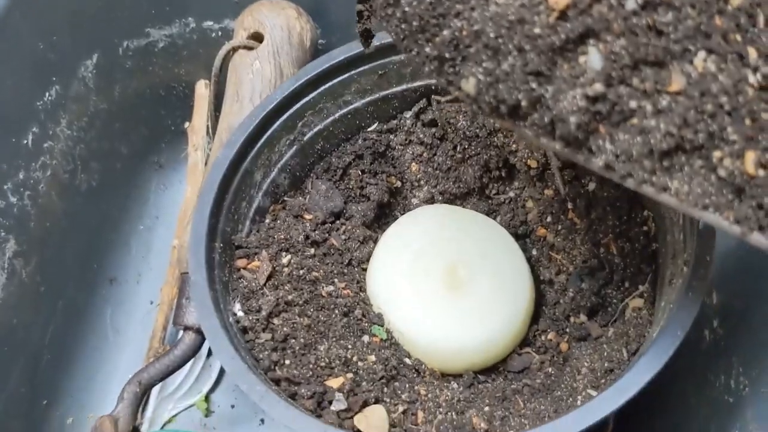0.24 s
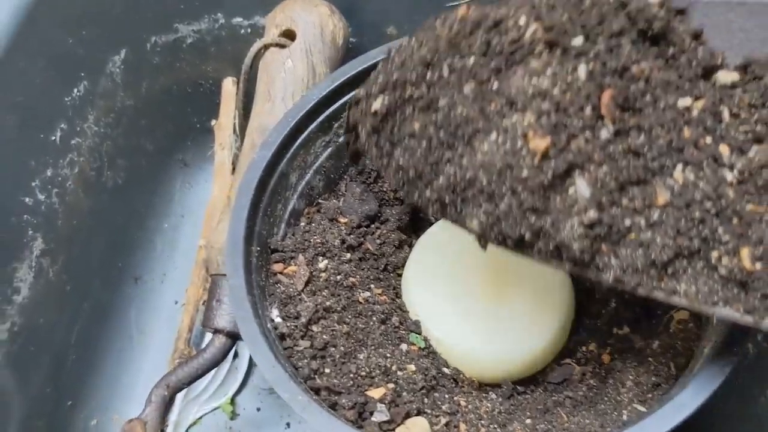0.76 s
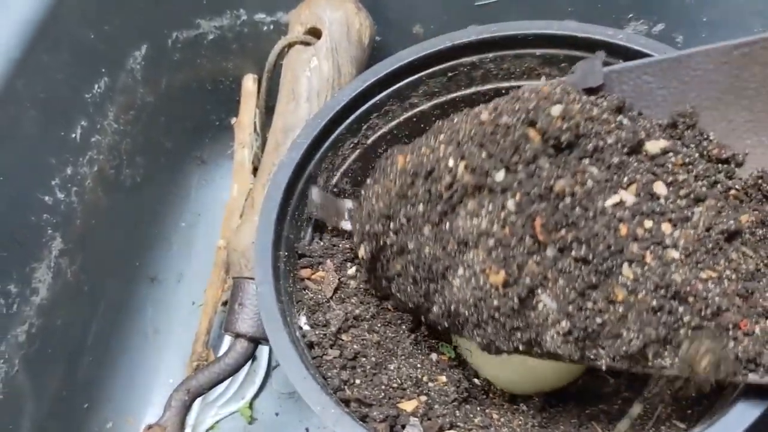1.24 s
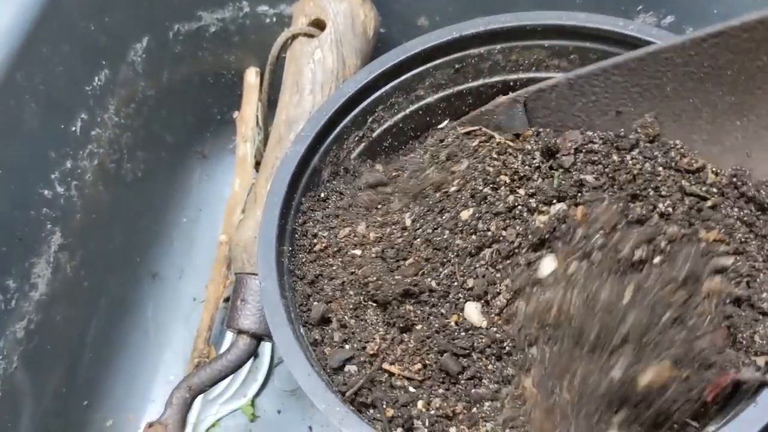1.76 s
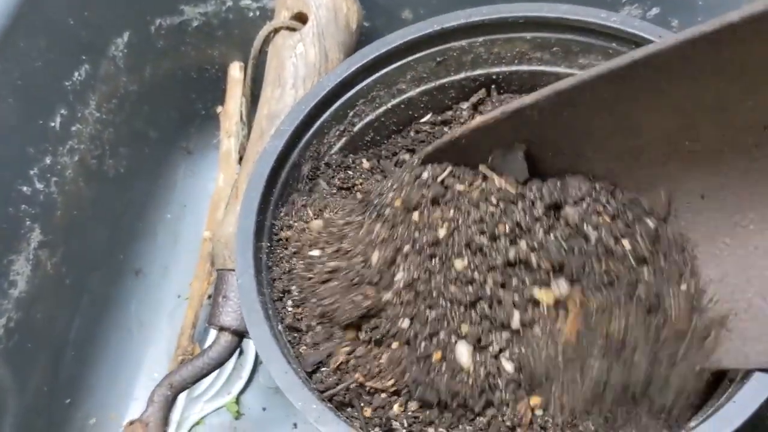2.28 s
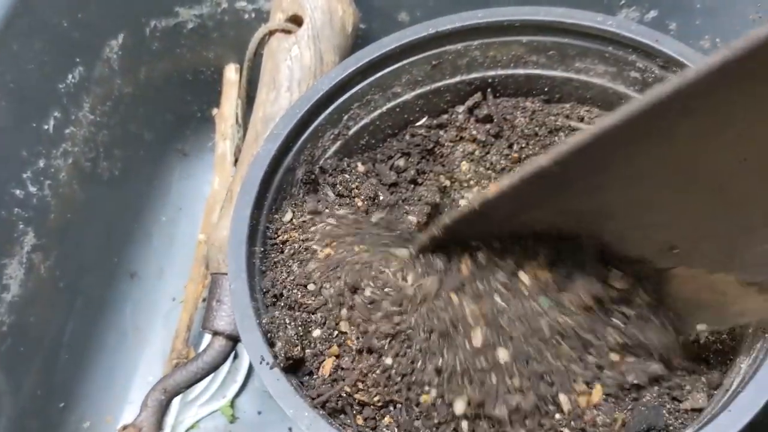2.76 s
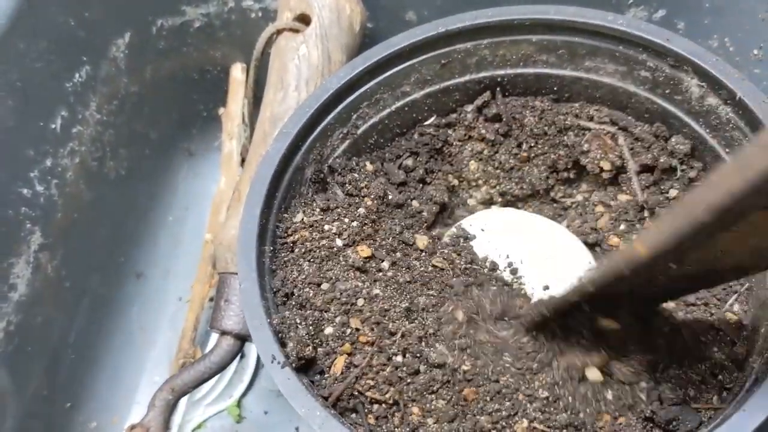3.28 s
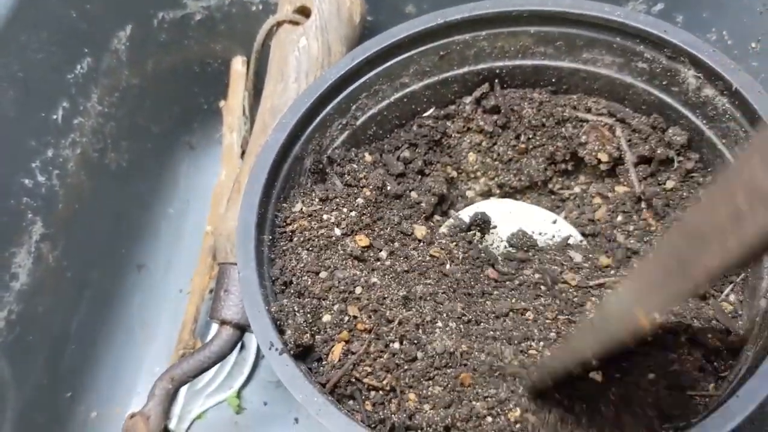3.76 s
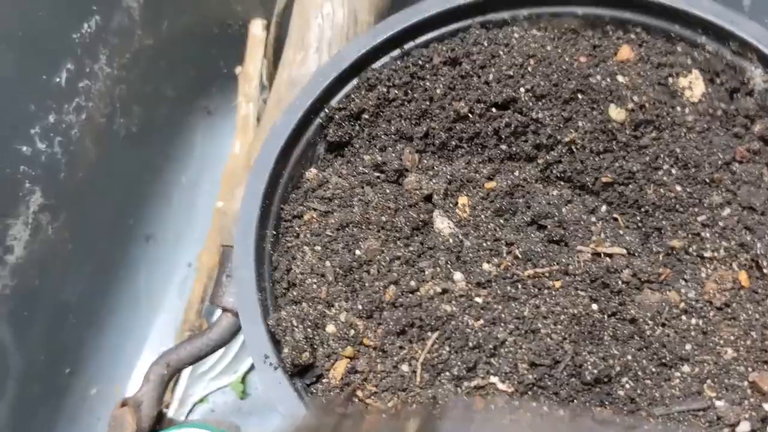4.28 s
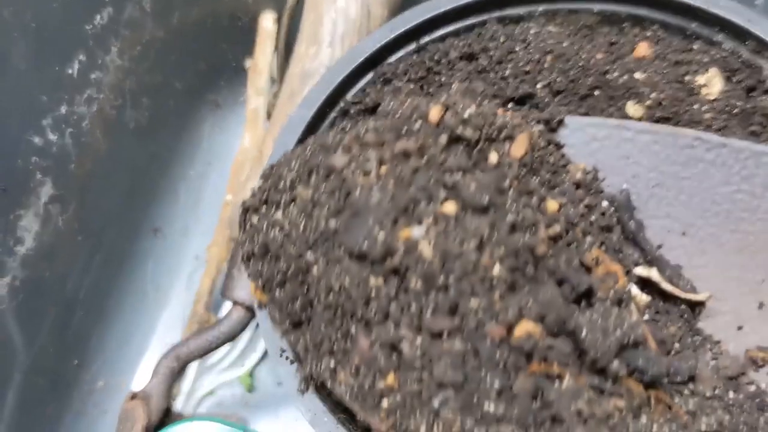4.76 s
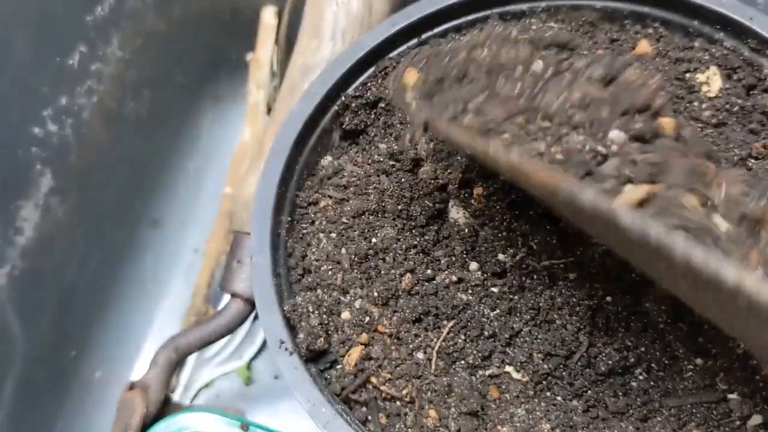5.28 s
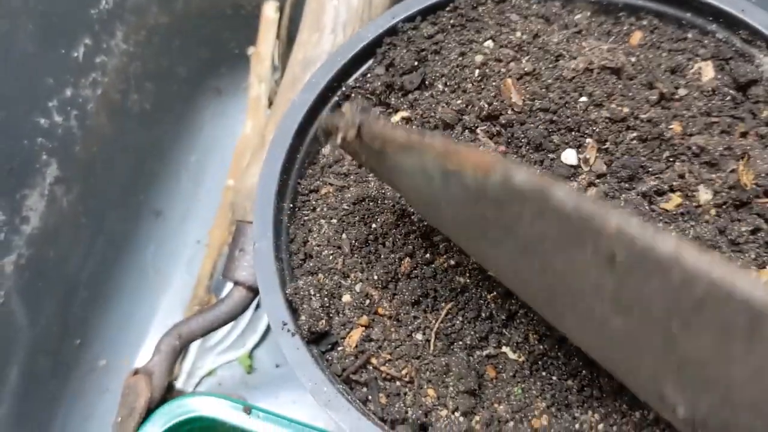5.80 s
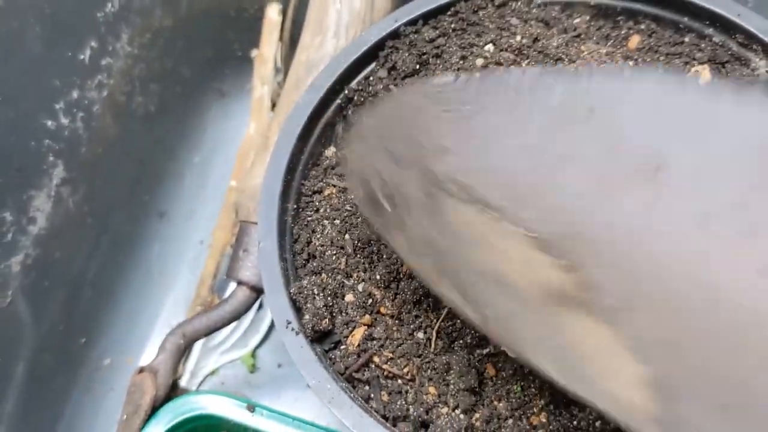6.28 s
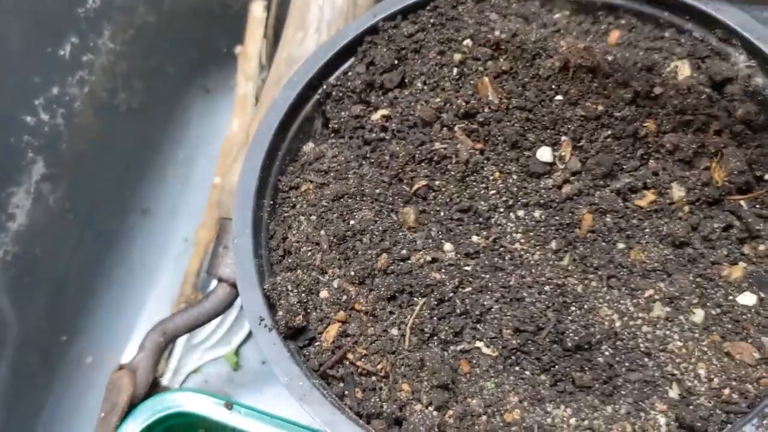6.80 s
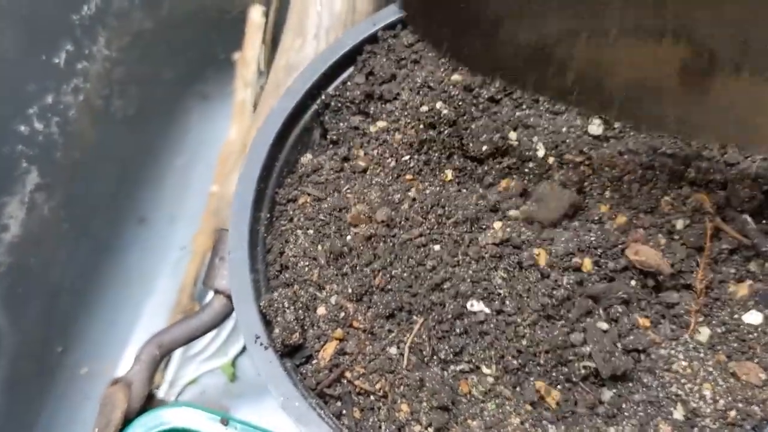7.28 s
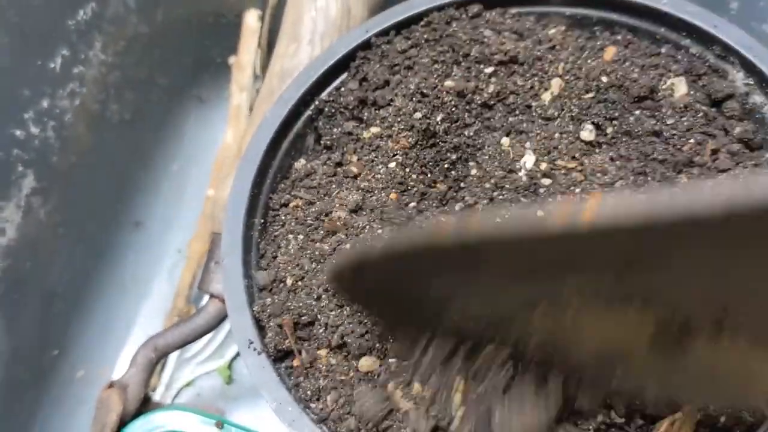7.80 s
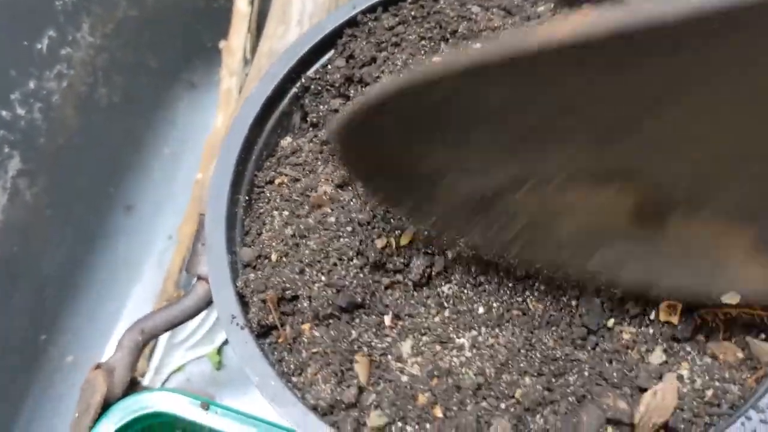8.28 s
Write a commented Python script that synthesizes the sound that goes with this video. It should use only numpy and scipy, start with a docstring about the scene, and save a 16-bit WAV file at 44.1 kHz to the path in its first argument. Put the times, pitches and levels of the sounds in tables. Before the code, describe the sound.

Close crunching and hissing of potting soil poured from a metal trowel, hollow knocks on the pot, a brief silence midway, faint outdoor rumble.

```python
"""Gritty soil runs off a steel trowel around a bulb in a plastic pot, outdoors and close to the microphone.
Crumbs and grit are showers of tiny noise clicks, pebbles are filtered bursts, and lumps swell in low noise.
The blade scrapes and clinks in decaying sine modes; it knocks on the pot, which thumps in its tub.
A distant bang of low swings and noise echoes at the start, over a steady rumble, hiss and hum.
Halfway, the sound cuts out briefly between two scoops."""
import sys
import numpy as np
from scipy import signal
from scipy.fft import rfft, irfft, next_fast_len
from scipy.io import wavfile

SR = 44100
rng = np.random.default_rng(int(sys.argv[2]) if len(sys.argv) > 2 else 0)


def transcribe(u):
    """Save the signal u as a 16-bit wav file named by the first command-line argument.

    u: samples, shape (n,) or (channels, n), limited to [-1, 1]; the rate is SR.
    q: integer samples, one column per channel.
    """
    v = np.clip(np.atleast_2d(u).T, -1, 1)
    q = np.round(v * 32767).astype(np.int16)
    wavfile.write(sys.argv[1], SR, q)


N = 376613
TIME = np.arange(N) / SR

# Steady air of the place: (frequency [Hz], relative density [dB per Hz])
AIR_SPECTRUM = [(15, -23.5), (25, 0), (102, -4), (190, -6.5), (223, -13), (326, -8), (363, -14.5),
                (394, -11), (545, -17), (695, -16.5), (1330, -21.5), (1940, -22), (2220, -23.5),
                (14400, -34), (16000, -38)]
# Distant machinery: (frequency [Hz], level [dB])
HUM_TONES = [(102, -66), (151, -67.5), (329, -65), (2930, -78.5)]
# Likeness of surrounding sound at the two ports: (frequency [Hz], correlation [-1 to 1])
PORT_LIKENESS = [(100, 0.9), (300, 0.8), (700, 0.28), (1400, -0.069), (3000, -0.0032), (16000, -0.071)]
# Lean of close sound from the pot: (frequency [Hz], left over right [dB])
NEAR_LEAN = [(200, 5.5), (600, -3.5), (1400, 3.5), (3000, 4.5), (5500, 26.5), (9000, 32.5), (14000, -12)]

# Distant bang, then its echoes off buildings: (time [s], relative level [dB], low-pass corner [Hz])
BANG_ECHOES = [(.139, -12.5, 6000), (0.221, -33.5, 1200), (.311, -28.5, 444), (.478, -31.5, 527),
               (.56, -42.5, 293), (0.681, -38, 193)]
# Low pressure swings of the bang: (frequency [Hz], relative level [dB], t60 [s])
BLAST_SWINGS = [(84.7, 3, 0.14), (160.4, -4, 0.18)]
# Roar of the bang: (frequency [Hz], relative density [dB per Hz])
ROAR_SPECTRUM = [(40, -26), (100, -3.5), (170, -3), (240, -11.5), (420, -10.5), (620, -12.5), (830, -14.5),
                 (1200, -26), (2200, -34.5), (3800, -49.5), (8000, -53), (15000, -57)]
# Dying of the roar: (frequency [Hz], t60 [s])
ROAR_DECAY = [(60, 1), (200, 0.27), (700, 0.22), (3000, 0.37), (10000, 0.48)]

# Trowel against the pot: (time [s], relative wall level [dB], hardness as low-pass [Hz], thump level [dB])
POT_KNOCKS = [(2.074, -22.5, 940, -49), (3.247, -24.5, 2220, -47), (3.417, -24, 1700, -45),
              (3.755, -37, 1620, -65), (3.999, -26, 2500, -30), (4.13, -60.5, 390, -26.5),
              (4.2547, -14, 3350, -16), (5.675, -33.5, 855, -76), (5.74, -34.5, 1400, -65),
              (7.107, -13, 2570, -12.5), (7.991, -17.5, 1760, -55), (8.042, -12, 3900, -24),
              (8.088, -15, 5700, -29), (8.1005, -12, 1320, -23.5)]
# Modes of the plastic wall: (mean frequency [Hz], relative level [dB], t60 [s])
WALL_MODES = [(375, -17, 0.047), (470.5, -19, 0.11), (570, -2, 0.015), (701, -6.5, 0.034), (848, -4, 0.035),
              (1073, -10, 0.023), (1370, -8.5, 0.028), (1620, -2, 0.014), (1872, 4, 0.021), (2360, 7, 0.01),
              (2820, 6, 0.011), (3264, 5, 0.014), (4010, -2, 0.016), (5180, -1, 0.0084)]
# Filled pot rocking in its tub: (frequency [Hz], relative level [dB], t60 [s])
TUB_MODES = [(77, -19.5, 0.32), (134, 0, 0.16), (200.7, 0, 0.081), (292.5, -7.5, 0.1)]

# Modes of the bare blade: (frequency [Hz], relative level [dB], t60 [s], left over right [dB])
BLADE_MODES = [(1902, -9, 0.95, 4), (2672, -17, 0.38, -13.5), (3330, -7, 0.16, -10.5),
               (4040, 4.5, 0.073, 2), (4790, -2, 0.15, 2), (5460, -7.5, .17, 1), (5530, 1.5, 0.05, -9),
               (6560, -9, .17, -13.5), (7250, -14, 0.17, 17.5), (7860, -24, .17, 8), (8330, -16, 0.21, 5),
               (8600, 6.5, 0.065, -1), (9700, -12.5, .15, -5), (10610, -6, .11, 4), (11110, -16, .09, -26),
               (13370, -22, .13, 2), (13790, -4, 0.1, -9), (15310, -17, .12, -3)]
# Steel struck by a stone or the rim:
# (time [s], relative ring [dB], tilt [dB per octave], favoured tone [Hz], relative clash [dB])
STEEL_CLINKS = [(1.932, -45, 2, 4800, -44), (4.212, -49, 0, 2650, -47), (5.453, -40, 5, 4800, -37),
                (7.107, -46, -2.5, 2700, -58), (7.6283, -31, 6, 8600, -15), (8.089, -32, 2.5, 4800, -17),
                (8.103, -47, -9, 1900, -40)]
# Grit along the steel: (time [s], length [s], level [dB], tilt [dB per octave], favoured tone [Hz])
GRIT_SCRAPES = [(1.499, 0.053, -54, -3, 5760), (2.3, 0.54, -51, -2.5, 7300), (2.62, 0.82, -54.5, 0, 1900),
                (3.338, 0.1, -55.5, -3, 4020), (3.839, .11, -51, -1, 7400),
                (4.21, 0.054, -47.5, -1.5, 2650), (5.275, 0.18, -56.5, 7, 3160),
                (5.439, 0.18, -46.5, 11, 4800), (5.745, 0.43, -55, 6, 7600), (6.38, 0.24, -57, 4, 4400),
                (6.596, .12, -54, 4, 3300), (7.589, 0.062, -50, 1, 1900)]

# Two scoops running off the blade: (time [s], relative coarse crumbs [dB], relative fine grit [dB])
SOIL_POURS = [
    [(1.4, -67, -47), (1.51, -60, -60), (1.65, -65.5, -58.5), (2.05, -65, -63.5), (2.17, -60, -59),
     (2.42, -54.5, -53.5), (2.53, -55, -56.5), (2.78, -56, -68), (3.12, -55.5, -61), (3.24, -53, -53.5),
     (3.41, -74, -90), (3.52, -58, -69)],
    [(5.1, -78, -62), (5.27, -76, -60.5), (5.396, -63.5, -55.5), (5.518, -68, -51), (5.628, -59, -55),
     (5.766, -67, -60), (5.92, -67.5, -63), (6.07, -71, -68.5), (6.324, -69, -56.5), (6.494, -67.5, -56.5),
     (6.638, -72.5, -69), (6.93, -69, -57.5), (7.08, -88, -65)],
]
# Clumps letting go at once: (time [s], length [s], relative coarse crumbs [dB], relative fine grit [dB])
SOIL_SPILLS = [(0.984, 0.089, -66, -56.5), (1.721, 0.089, -61, -51), (2.871, 0.029, -54, -58),
               (2.979, .19, -48, -56.5), (3.368, 0.1, -53, -58), (3.992, 0.059, -46.5, -50),
               (7.197, 0.062, -66, -55.5), (7.795, 0.077, -53.5, -47), (7.997, 0.18, -47.5, -50.5)]
# Lumps landing in the pot: (time [s], relative level [dB], length [s])
SOIL_CLODS = [(1.606, -48, 0.096), (2.085, -37.5, 0.14), (2.32, -46.5, 0.15), (2.973, -53, 0.25),
              (3.484, -39, 0.097), (3.624, -49.5, 0.17)]
# Dull landing on the pot: (frequency [Hz], relative density [dB per Hz])
THUD_SPECTRUM = [(40, -7), (90, -0.5), (150, 3), (220, -0.5), (330, -11.5), (600, -24), (1500, -56)]
# Single stones: (time [s], relative level [dB], centre [Hz], left over right [dB])
LONE_PEBBLES = [(.9592, -40.5, 6640, 7), (1.2192, -33, 5940, 13.5), (1.494, -33, 4660, 10.5),
                (1.5703, -36, 4300, 10), (2.1036, -33, 3260, 10.5), (2.168, -32.5, 4230, 8),
                (2.1987, -31.5, 4270, 8), (2.3212, -25, 3860, 8.5), (2.3398, -20.5, 3600, 3),
                (2.4765, -27.5, 8500, 2), (2.7256, -22, 3500, 5.5), (2.9412, -27, 3200, 1),
                (2.9502, -22, 2780, 5.5), (3.006, -26.5, 4080, 3), (3.125, -20, 4150, 3),
                (3.133, -20, 4500, 4), (3.1685, -26.5, 4100, 8), (3.9035, -32.5, 4770, -5),
                (5.3725, -34, 5000, 11), (5.5561, -24, 3970, 11), (5.749, -30.5, 3380, 10),
                (5.7826, -22, 6450, 5.5), (5.9224, -23.5, 3400, 8), (5.9369, -25, 6800, 9),
                (6.304, -26.5, 3400, 10), (6.331, -29.5, 3480, 8), (6.368, -26, 5030, 8.5),
                (6.6582, -27, 11400, 4), (6.7747, -42, 4930, 16), (6.8393, -21.5, 7140, 7.5),
                (6.9132, -39, 3160, 9), (8.2467, -36, 2860, 14)]
# Coarse crumbs: (frequency [Hz], relative density [dB per Hz])
CRUNCH_SPECTRUM = [(240, -28), (450, -2), (750, 3), (1100, -1), (1500, -2), (1900, 3.5), (2300, -2.5),
                   (3000, -3.5), (4100, -6.5), (5900, -22.5), (15000, -41)]
# Fine grit: (frequency [Hz], relative density [dB per Hz])
GRIT_SPECTRUM = [(1500, -43), (3000, -5), (4200, -7.5), (6500, -3), (9000, -10.5), (12000, -13.5),
                 (15500, -14)]
# Silence between the scoops: (start [s], end [s])
SILENCE = (4.2733, 4.405)

# Loose soil shivers after a hit: level against the hit [dB], t60 after a knock [s]
SETTLE_DB, SETTLE_T60 = -19, 0.17
# Small stones carried by a pour: rate [1/s], level above the flow [dB], spread [dB], median centre [Hz]
STONES_PER_S, STONE_DB, STONE_SPREAD_DB, STONE_HZ = 15, 10.5, 7.5, 4300
POUR_FADE_S, SPILL_RISE_S = 0.18, 0.0063
LOW_CUT_HZ, EDGE_HZ = 48, 16100  # lower and upper limits of the microphone sound


def amp(db):
    """Decibels to gain."""
    return 10 ** (np.asarray(db) / 20)


def unit(x):
    """Scales to rms 1."""
    return x / np.sqrt(np.mean(x ** 2) + 1e-20)


def read(points, hz):
    """Reads a table on a log-frequency axis."""
    f, value = np.transpose(points)
    return np.interp(np.log(hz + 1), np.log(f + 1), value)


def pan(db):
    """Left and right gains for a left-over-right level difference."""
    return amp(np.array([[0.5], [-0.5]]) * db)


def add(mix, s, sound):
    """Mixes a sound in at time s."""
    part = mix[:, round(s * SR):][:, :sound.shape[1]]
    part += sound[:, :part.shape[1]]


def colour(x, spectrum, near=False):
    """Applies a spectrum, and the left-right lean of the close pot if near."""
    size = next_fast_len(x.shape[1], True)
    hz = np.fft.rfftfreq(size, 1 / SR)
    gain = amp(read(spectrum, hz))
    if near:
        gain = gain * pan(read(NEAR_LEAN, hz))
    return irfft(rfft(x, size) * gain, size)[:, :x.shape[1]]


def soften(x, hz, kind="low", order=2):
    """Causal low-pass or high-pass."""
    corner = np.clip(hz, 20, SR / 2 - 500)
    return signal.sosfilt(signal.butter(order, corner, kind, fs=SR, output="sos"), x)


def diffuse(count):
    """Noise from all around: much alike at both ports only in the bass."""
    size = next_fast_len(count, True)
    a, b = rfft(rng.standard_normal((2, size)))
    same = np.clip(read(PORT_LIKENESS, np.fft.rfftfreq(size, 1 / SR)), -1, 1)
    return irfft([a, same * a + np.sqrt(1 - same ** 2) * b], size)[:, :count]


def dying(t, t60):
    """Falls 60 dB in t60 seconds."""
    return np.exp(-np.log(1000) * t / t60)


def sine(hz, t):
    """A steady tone."""
    return np.sin(2 * np.pi * hz * t)


def drift(per_s, count):
    """Slow random wandering of rms about 1, through per_s random points a second."""
    knots = rng.standard_normal(int(count / SR * per_s) + 3)
    return 1.2 * np.interp(np.arange(count) / SR * per_s, np.arange(len(knots)), knots)


def grains(per_s, spread_db, t60, kinds=8):
    """Random tiny impacts of uneven size, each kind with its own brief rattle."""
    t, out = np.arange(512) / SR, np.zeros((2, N))
    for _ in range(kinds):
        where, size = rng.random((2, int(per_s * N / SR / kinds)))
        size_db = spread_db * np.minimum(-np.log(1 - size), 4)
        clicks = np.bincount((where * N).astype(int), amp(size_db), N)
        rattle = unit(rng.standard_normal((2, len(t))) * dying(t, t60))
        out += signal.oaconvolve(clicks[None], rattle, axes=1)[:, :N]
    return out


def outdoors(air_db=-53.5, waver_hz=3.97, lean_db=2.5):
    """Steady distant rumble and hiss from filtered noise, with a faint hum of wavering tones."""
    hum = 0
    for hz, db in HUM_TONES:
        cycles = np.cumsum(hz + waver_hz * drift(15, N)) / SR
        hum = hum + amp(db) * np.sin(2 * np.pi * cycles)
    return amp(air_db) * unit(colour(diffuse(N), AIR_SPECTRUM)) * pan(lean_db) + hum


def rolling(level_db=-43, t60=1.65):
    """The bang rolls away as a faint long rumble of dying noise."""
    out, t = np.zeros((2, N)), np.arange(2 * SR) / SR
    rumble = unit(colour(diffuse(len(t)), ROAR_SPECTRUM)) * dying(t, t60)
    add(out, BANG_ECHOES[0][0], amp(level_db) * rumble)
    return out


def bang(rise=0.0045, swell=0.017, blast_db=11.0):
    """A far bang: low pressure swings and scattered roar, returning from buildings as duller echoes."""
    out, t = np.zeros((2, N)), np.arange(SR) / SR
    swings = sum(amp(db + blast_db) * sine(hz, t) * dying(t, t60) for hz, db, t60 in BLAST_SWINGS)
    blast = swings * (1 - np.exp(-t / swell))
    for s, db, dull_hz in BANG_ECHOES:
        noise = unit(colour(diffuse(SR), ROAR_SPECTRUM))
        hz, age, z = signal.stft(noise, SR, nperseg=512)
        z = z * dying(age, read(ROAR_DECAY, hz)[:, None])  # each band dies at its own rate
        roar = signal.istft(z, SR, nperseg=512)[1][:, :SR] * (1 - np.exp(-t / rise))
        add(out, s, amp(db) * soften(roar + blast, dull_hz, order=1))
    return out


def knocks(wall_db=-7.0, crack_db=7.0, crack_t60=0.0057, wall_rise=0.0008, thump_rise=0.014):
    """The plastic wall clacks and shakes the soil, while the whole pot swells into a low thump."""
    wall, thump, t = np.zeros((2, N)), np.zeros((2, N)), np.arange(SR // 4) / SR
    rock = sum(amp(db) * dying(t, t60) * sine(hz, t) for hz, db, t60 in TUB_MODES)
    rock = rock * (1 - np.exp(-t / thump_rise))
    for s, db, hard_hz, thump_db in POT_KNOCKS:
        clack = 0
        for hz, mode_db, t60 in WALL_MODES:
            # every blow lands on another spot, so the modes shift; the ports differ more in the treble
            shifted_hz = hz * (1 + 0.037 * rng.standard_normal())
            phase = 2 * np.pi * rng.random() + hz / 2500 * rng.standard_normal((2, 1))
            clack = clack + amp(mode_db) * dying(t, t60) * np.sin(2 * np.pi * shifted_hz * t + phase)
        crack = rng.standard_normal((2, len(t)))
        crack *= dying(t, crack_t60) + amp(SETTLE_DB) * dying(t, SETTLE_T60)
        blow = (clack + amp(crack_db) * crack) * (1 - np.exp(-t / wall_rise))
        add(wall, s, amp(db + wall_db) * soften(blow, hard_hz))
        add(thump, s, amp(thump_db) * pan(1.2) * rock)
    return colour(wall, [(100, 13.0), (500, 2.5), (16000, -3.0)], near=True) + thump


def blade(tilt_db, favoured_hz, damping=1, favour_db=9.0, reach=0.089, count=SR):
    """Steel modes: the spot touched favours tones within a reach [octaves], and soil lying on it damps them."""
    t, ring = np.arange(count) / SR, 0
    for k, (hz, db, t60, side_db) in enumerate(BLADE_MODES):
        closeness = np.exp(-(np.log2(hz / favoured_hz) / reach) ** 2)
        level_db = db + tilt_db * np.log2(hz / 5000) + favour_db * closeness
        # higher tones reach the two ports out of step
        port_phase = np.array([[0], [min(hz / 3500, np.pi / 2)]])
        tone = dying(t, t60 / damping) * np.sin(2 * np.pi * hz * t + port_phase)
        ring = ring + (-1) ** k * amp(level_db) * pan(side_db) * tone
    return ring


def clinks(ring_db=-2.5, clash_db=5.5, clash_t60=0.068, rise=0.00017):
    """Struck steel: a noise clash near the favoured tone, over the blade's own ring."""
    out, t = np.zeros((2, N)), np.arange(SR) / SR
    for s, db, tilt_db, favoured_hz, hit_db in STEEL_CLINKS:
        burst = rng.standard_normal((2, SR)) * dying(t, clash_t60)
        clash = soften(soften(burst, 1.04 * favoured_hz, "high"), 0.9 * favoured_hz) * pan(-2.3)
        clink = amp(db + ring_db) * blade(tilt_db, favoured_hz) + amp(hit_db + clash_db) * clash
        add(out, s, clink * (1 - np.exp(-t / rise)))
    return out


def scrapes(damping=2.4, rasp_db=-10, soft_hz=8500, chatter_db=2.5, chatter_per_s=35):
    """Each slide of grit is an uneven rasp of tiny clicks that keeps the softened blade ringing."""
    out, clicks = np.zeros((2, N)), unit(grains(per_s=3100, spread_db=3.5, t60=0.001))
    for s, length, db, tilt_db, favoured_hz in GRIT_SCRAPES:
        rub = clicks[:, round(s * SR):round((s + length) * SR)]
        rub = amp(db) * rub * signal.windows.tukey(rub.shape[1], 0.5)
        ring = blade(tilt_db, favoured_hz, damping, favour_db=15.5, count=SR // 4)
        ring = soften(ring, soft_hz, order=3)
        add(out, s, signal.fftconvolve(rub, ring / np.linalg.norm(ring[0]), axes=1))
        add(out, s, amp(rasp_db) * soften(rub, 3000, "high"))
    return out * amp(chatter_db * drift(chatter_per_s, N))


def flow():
    """Gains of coarse crumbs and fine grit: two long pours, and spills that start fast and run out."""
    gains = np.zeros((2, N))
    for pour in SOIL_POURS:
        s, *levels = np.transpose(pour)
        fade = np.clip(np.minimum(TIME - s[0], s[-1] - TIME) / POUR_FADE_S, 0, 1)
        gains += fade * amp([np.interp(TIME, s, db) for db in levels])
    for s, length, coarse_db, fine_db in SOIL_SPILLS:
        t = np.arange(0, length, 1 / SR)
        run = np.minimum(t / SPILL_RISE_S, 1) * (1 - t / length) ** 0.6
        add(gains, s, amp([[coarse_db], [fine_db]]) * run)
    return gains


def clods(coarse, patter_db=-1.0, attack_s=0.006, release=0.71, lump_db=-5.0):
    """Low noise: falling crumbs drum softly on the pot; whole lumps land harder and tumble for a moment."""
    swell = amp(patter_db) * coarse
    for s, db, length in SOIL_CLODS:
        age = TIME - s
        fall = 1 + (length / 2 - age) / (release * length)
        swell = swell + amp(db + lump_db) * np.clip(np.minimum(age / attack_s, fall), 0, 1)
    return unit(colour(diffuse(N), THUD_SPECTRUM)) * swell


def small_stones(coarse, fine, spread_octaves=0.35, side_db=10.0):
    """Stones scattered along each pour, louder when more soil runs: rows like those of LONE_PEBBLES."""
    rows = []
    for pour in SOIL_POURS:
        start, end = pour[0][0], pour[-1][0]
        draws = rng.standard_normal((int(STONES_PER_S * (end - start)), 4))
        for k, (when, size, pitch, side) in enumerate(draws):
            s = np.clip(start + (end - start) * (k + when) / len(draws), start, end)
            i = round(s * SR)
            flow_db = 20 * np.log10(np.hypot(coarse[i], fine[i]) + 1e-9)
            db = flow_db + STONE_DB + STONE_SPREAD_DB * min(size, 1)
            rows.append((s, db, STONE_HZ * 2 ** (spread_octaves * pitch), side_db + 2 * side))
    return rows


def pebbles(stones, level_db=-8.5, low=0.55, high=1.28, t60=0.0089, rise=0.00026):
    """Each stone is a band of noise: a dry tick, then a faint rattle as it settles."""
    out, t = np.zeros((2, N)), np.arange(SR // 10) / SR
    envelope = dying(t, t60) + amp(SETTLE_DB) * dying(t, SETTLE_T60 / 2)
    envelope *= 1 - np.exp(-t / rise)
    for s, db, hz, side_db in stones:
        burst = rng.standard_normal((2, len(t))) * envelope
        tick = soften(soften(burst, hz * low, "high"), hz * high)
        tick /= np.sqrt(np.mean(tick[:, :SR // 500] ** 2))  # level set by the first 2 ms
        add(out, s, amp(db + level_db) * pan(side_db) * tick)
    return out


def soil(coarse, fine, crunch_db=6.0, grit_db=2.0, clump_db=2.5, clumps_per_s=70):
    """Showers of tiny impacts: crumbs crunch as they land and fine grit hisses, both in little clumps."""
    landing = unit(colour(grains(per_s=1600, spread_db=4.5, t60=0.012), CRUNCH_SPECTRUM, near=True))
    hiss = unit(colour(grains(per_s=2400, spread_db=4.6, t60=0.006), GRIT_SPECTRUM)) * pan(1.5)
    clumps = amp(clump_db * drift(clumps_per_s, N))
    return clumps * (amp(crunch_db) * coarse * landing + amp(grit_db) * fine * hiss)


def scene():
    """All sources together; the flow of soil drives the crunch, the drumming and the small stones."""
    coarse, fine = flow()
    around = outdoors() + rolling() + bang()
    trowel = knocks() + clinks() + scrapes()
    stones = pebbles(LONE_PEBBLES + small_stones(coarse, fine))
    return around + trowel + clods(coarse) + stones + soil(coarse, fine)


def record(dry):
    """The microphone's low cut, a short silence between the two scoops, then the band limit."""
    live = (TIME < SILENCE[0]) | (TIME > SILENCE[1])
    sound = soften(dry, LOW_CUT_HZ, "high", order=3) * live
    band_limit = signal.firwin(255, EDGE_HZ, window=("kaiser", 9), fs=SR)
    return signal.oaconvolve(sound, band_limit[None], "same")


dry = scene()
out = record(dry)
transcribe(out)
```